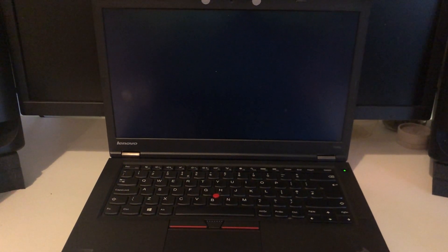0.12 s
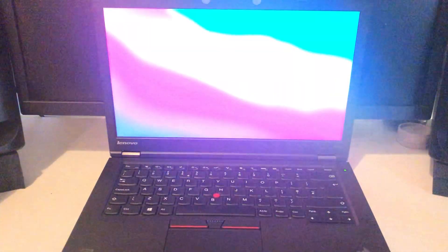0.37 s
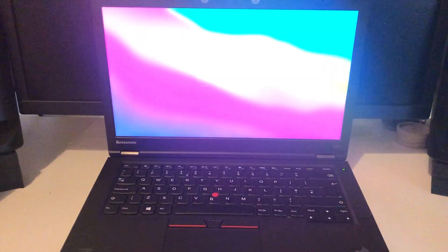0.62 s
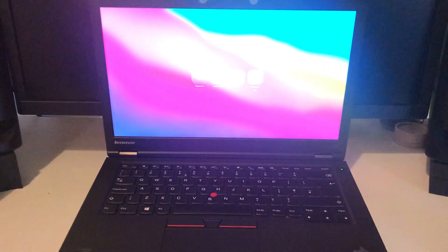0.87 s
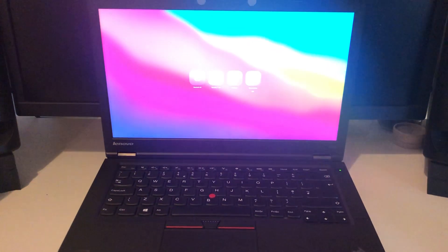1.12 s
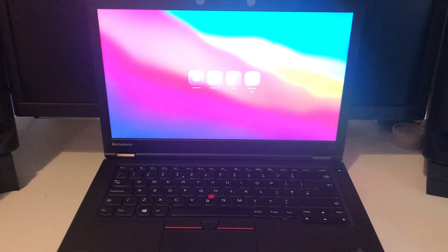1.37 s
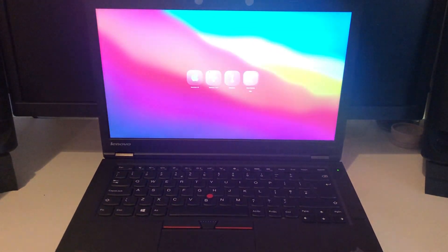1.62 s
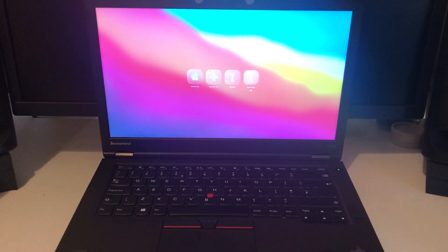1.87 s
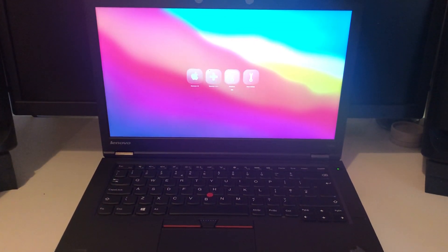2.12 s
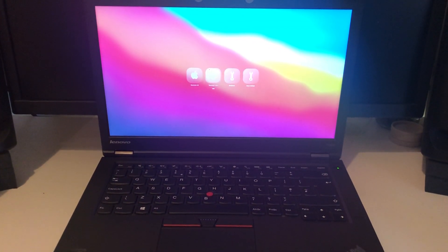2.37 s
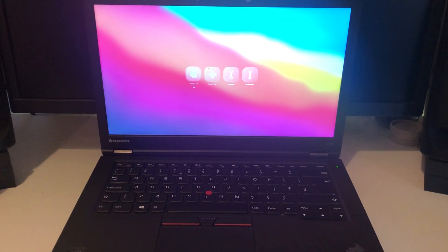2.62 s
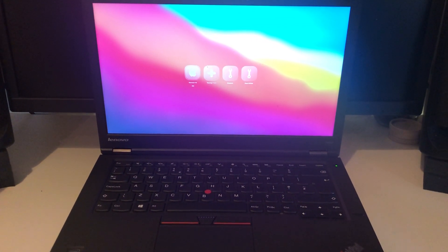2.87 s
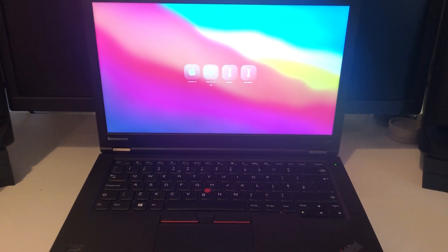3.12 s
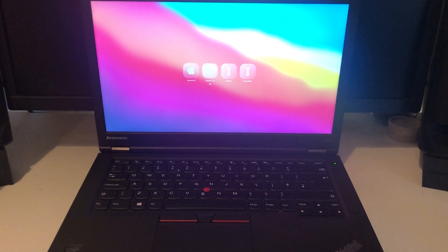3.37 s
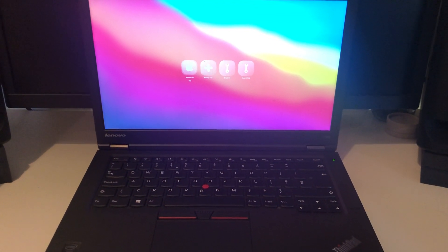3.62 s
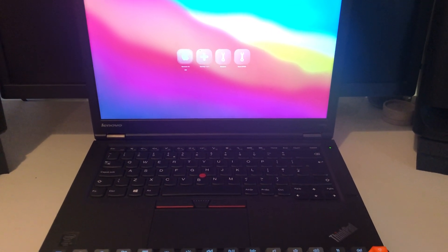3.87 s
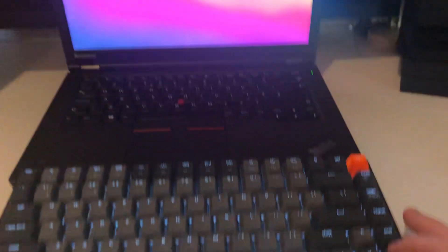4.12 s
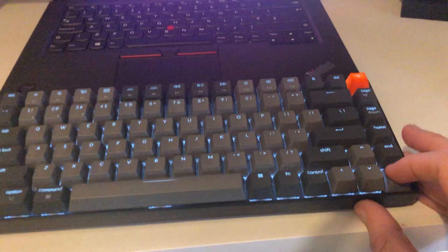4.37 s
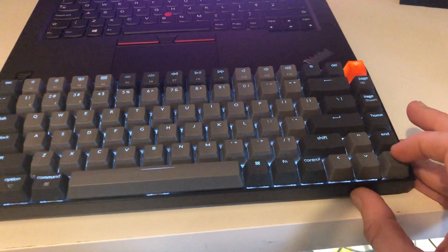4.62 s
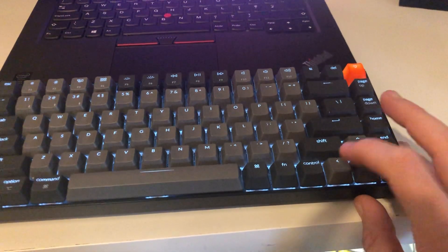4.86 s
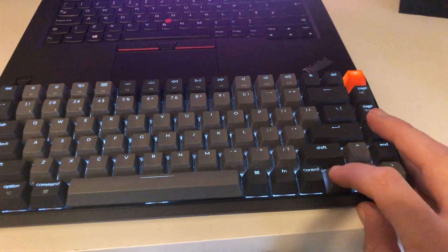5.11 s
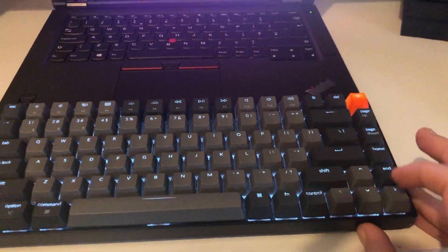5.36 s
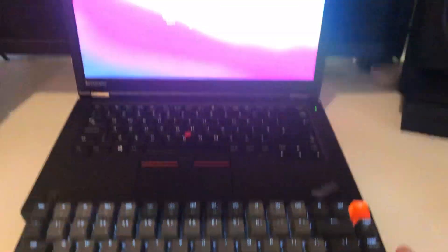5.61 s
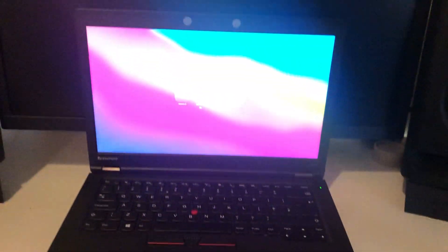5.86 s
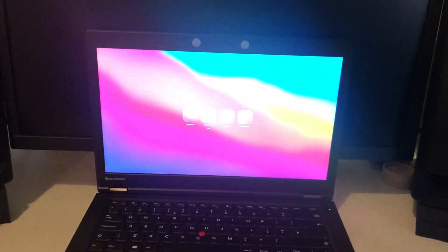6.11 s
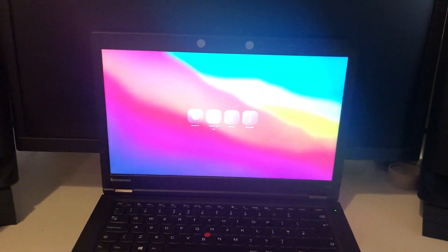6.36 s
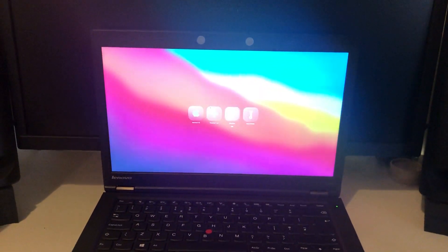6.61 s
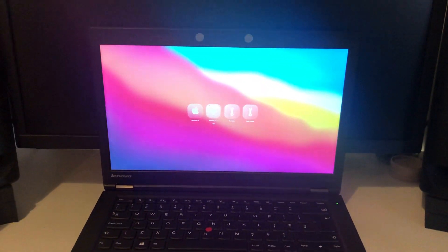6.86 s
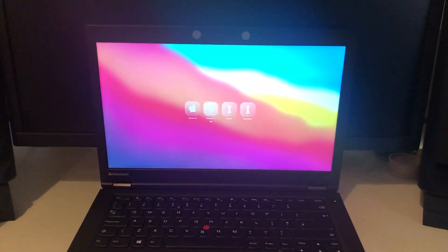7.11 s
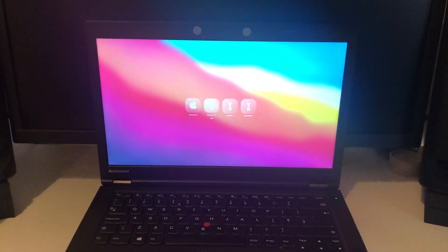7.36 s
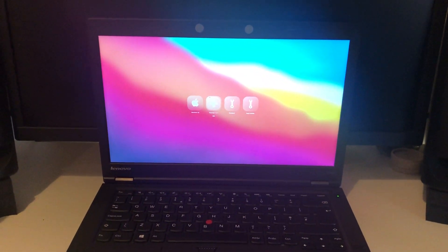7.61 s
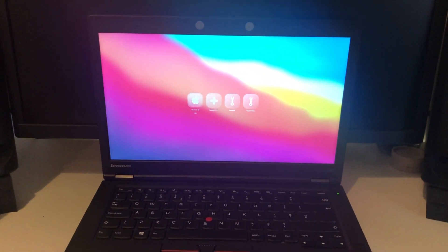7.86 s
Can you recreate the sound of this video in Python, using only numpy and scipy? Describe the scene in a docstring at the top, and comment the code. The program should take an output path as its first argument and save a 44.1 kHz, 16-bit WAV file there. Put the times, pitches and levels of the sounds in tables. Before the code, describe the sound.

A quiet room with faint air, a low wavering rumble and thin microphone hiss. Close by, a mechanical keyboard on a desk is pressed. From 0.1 to 0.6 s four quick, even, light clacks run about 0.15 s apart, with two more near 0.95 and 1.15 s and small spring-back clicks between. A lull holds a very faint bump at 1.5 s. Fuller, hollower presses fall at 2.0, 2.2 and 2.5 s, then 3.1, 3.5 and 3.7 s, each with a clicking release. A soft bump at 4.1 s precedes a dense flurry from 4.4 to 5.3 s, bright and snappy, with a thuddier first hit. Near silence follows until about 6.2 s, when tiny ticks lead to three presses at 6.5 to 6.7 s. A dull low desk bump sounds around 7.0 s, then a firm press at 7.7 s and a sharp, loud release. Short room tail throughout.

```python
"""From the start, faint room air, a low wavering rumble and microphone hiss, all made of coloured noise. Over
them a finger works a mechanical keyboard on a desk, close to a hand-held phone in a quiet room. Each touch,
bottoming-out and release clicks the cap and switch, rings the plastic case and thuds in the desk, all as damped
resonances; a decaying noise tail answers as the room. From 1.46 s a few low tones ring out in small clusters."""
import sys
import numpy as np
from scipy import signal
from scipy.fft import rfft, irfft, next_fast_len
from scipy.io import wavfile
from scipy.ndimage import map_coordinates

SR = 44100
rng = np.random.default_rng(int(sys.argv[2]) if len(sys.argv) > 2 else 0)


def elevation(decibels):
    """Turn decibel levels (scalar or array-like) into linear amplitude ratios."""
    levels = np.asarray(decibels, float)
    return 10 ** (levels / 20)


def wrap_up_sound(samples):
    """Save the sound to the file named by the first command line argument, as 16-bit audio."""
    columns = np.atleast_2d(samples).T
    # keep every value between -1 and 1, then stretch to whole-number steps
    tamed = np.clip(columns, -1, 1)
    steps = np.round(tamed * 32767).astype(np.int16)
    wavfile.write(sys.argv[1], SR, steps)


N = 351918

# Drift of the rumble. Each row: time in seconds, level in dB.
RUMBLE_LEVEL = [(0.0, -66.5), (0.49, -62), (0.9, -69), (1.2, -62.5), (1.64, -68.5), (2.18, -61),
                (2.87, -70.5), (3.13, -65), (3.45, -68.5), (3.67, -62.5), (3.85, -67), (4.45, -72.5),
                (4.62, -61), (5.18, -61.5), (5.5, -72.5), (5.73, -65.5), (6.6, -68), (6.82, -64),
                (7.7, -71.5), (7.87, -57), (7.98, -71)]
# Colour of the rumble. Each row: frequency in Hz, relative density in dB.
RUMBLE_COLOUR = [(15, -112), (30, -18.5), (50, -6.5), (118, 0.5), (211, -9), (267, -12), (330, -18.5),
                 (404, -13), (650, -62), (1100, -120)]
# Drift of the room air. Each row: time in seconds, level in dB.
AIR_LEVEL = [(0, -64.5), (1.2, -73), (1.7, -75), (3, -74), (4.3, -72.5), (5.6, -72), (7.3, -70), (8, -70)]
# Colour of the room air. Each row: frequency in Hz, relative density in dB.
AIR_COLOUR = [(200, -35), (330, -6.5), (500, -13.5), (1000, -12), (1500, -13.5), (2300, -26.5), (4500, -32),
              (9000, -49)]
# Colour of the microphone hiss. Each row: frequency in Hz, relative density in dB.
HISS_COLOUR = [(300, -37), (1500, 0), (3000, -2), (11000, -6.5), (15100, -10.5), (16500, -26)]
HISS_DB = -78

# A fingertip touches or rocks a cap, often just before a press. Each row: start in seconds,
# case ring in dB, click in dB re ring, brightness of the ring in dB per octave.
TOUCHES = [(0.029, -42.5, -11, 5), (0.189, -45, -9.5, 7), (0.396, -44, -17, 4), (0.709, -45.5, -13.5, 8),
           (0.788, -43.5, -17, 5.5), (0.832, -49, -8, 6), (0.909, -48.5, -10, 11.5), (1.244, -48.5, -10, 4),
           (1.621, -49.5, -13, 5), (1.691, -56, -6, -2), (1.746, -58.5, -1.5, -1.1), (1.82, -51, -21, 5),
           (2.12, -39.5, -15.5, 8.5), (2.325, -45.5, -18, -1.1), (3.07, -37.5, -3, 8),
           (3.187, -30.5, -15, 6), (3.765, -40.5, -11, 11.5), (4.43, -35.5, -5, 11),
           (4.594, -37.5, -13, .1), (4.688, -42, -8, 11.5), (4.742, -41.5, -9.5, 2),
           (4.84, -32.5, -2.5, 5.5), (4.986, -36, -7, 13), (5.097, -45, 2, 18), (5.174, -40, -12, 13),
           (6.16, -57, -31, 5), (6.232, -47.5, -16, 15), (6.439, -54, -17, 9), (6.46, -49.5, -11, 11.5),
           (6.713, -34, -12, 2), (7.15, -50.5, -16, 10.5), (7.174, -60, -15, 11), (7.192, -51, -19, 2),
           (7.474, -35.5, -12, 8.5), (7.516, -36.5, -11.5, 8.5)]
# A key springs back against its top stop. Each row: start in seconds, case ring in dB, click in dB re ring.
RELEASES = [(0.04, -26.5, -12.5), (0.204, -31.5, -18), (0.36, -28, -18.5), (0.846, -27, -15),
            (1.264, -35, -15.5), (2.11, -39, -24), (2.295, -32, -22), (2.6, -33, -18.5),
            (2.629, -33, -17.5), (3.196, -32, -7.5), (3.597, -26, -14), (3.608, -33, -16),
            (3.784, -27.5, -16.5), (4.538, -31.5, -18), (4.548, -36.5, -20), (4.693, -29, -20),
            (4.702, -38, -15), (5.089, -22.5, -12.5), (5.26, -22, -15.5), (5.27, -32.5, -15),
            (6.551, -37, -19), (6.847, -25.5, -16.5), (6.966, -41.5, -24), (7.766, -34, -16),
            (7.781, -16, -10.5), (7.929, -57, -18)]
# A key bottoms out. Each row: start in seconds, case ring in dB, click in dB re ring, desk thud in dB,
# place of the key from about -1 to 1.
PRESSES = [(0.137, -31, -14, -50.5, -0.23), (0.287, -28.5, -5.5, -44.5, -1), (0.436, -27.5, -7, -44.5, -1),
           (0.589, -27.5, -5.5, -44, -0.91), (0.945, -28, -8, -46, -0.85), (1.14, -28, -11.5, -46, -0.45),
           (1.991, -18.5, -12.5, -49, 1), (2.178, -19, -16, -47, 1), (2.466, -17.5, -14, -48, 0.97),
           (3.079, -19, -8, -46, -0.32), (3.49, -15.5, -16.5, -48, 0.37), (3.687, -19.5, -17, -46.5, 0.94),
           (4.438, -19, -6.5, -36, -0.61), (4.618, -25.5, -8, -55, -1.4), (4.769, -23.5, -7.5, -48, -1),
           (4.846, -20.5, -8, -43, -1.3), (4.996, -17, -14.5, -50, 0.53),
           (5.185, -17.5, -15.5, -49.5, 0.15), (6.48, -25, -10, -47.5, -0.68),
           (6.591, -23.5, -10.5, -46.5, 0.17), (6.722, -18.5, -13, -46, 1),
           (7.684, -17.5, -14.5, -46, 0.85)]
# Shared by each kind of contact: brightness in dB per octave, length in ms, thud in dB re ring.
TOUCH_MS, TOUCH_THUD_DB = 2, -19
RELEASE_TILT_DB, RELEASE_MS, RELEASE_THUD_DB = 0, 2.45, -29.5
PRESS_TILT_DB, PRESS_MS = 4, 2.6

# Resonances of cap and switch, excited by the click. Each row: centre in Hz, width in Hz, level in dB.
CAP_RESONANCES = [(1560, 3400, -13), (3090, 1260, 20), (5840, 2140, 22.5), (7980, 1020, 23),
                  (9240, 560, 22.5), (10650, 2260, 15), (13200, 2700, 10.5)]
# The switch spring, plucked by the click. Each row: pitch in Hz, level in dB, t60 in seconds.
SPRING_MODES = [(9250, -36, .15), (9420, -38, .1)]
# Gain of the clicks' top layer. Each row: time in seconds, gain in dB.
TREBLE_LEVEL = [(0, -0.5), (1.4, -1.5), (2.1, 4.3), (4, 2.5), (4.4, 4.5), (5.4, 6.4), (6.2, 2.5), (8, 3)]
# The keyboard case. Each row: pitch in Hz, level in dB, t60 in seconds before the finger damps it.
CASE_MODES = [(671.5, -20.5, 0.084), (872, -23.5, 0.14), (1102, -11.5, 0.091), (1209, -6.5, 0.039),
              (1286.5, -5.5, 0.038), (1469, -11.5, 0.046), (1673, -8.5, 0.028), (1774, -20.5, 0.084),
              (1907, -7.5, 0.028), (2091, -5.5, 0.023), (2415, -8.5, 0.014), (2651, -14, 0.023),
              (2990, -31.5, 0.11), (3374, -19.5, 0.023), (3906, -22.5, 0.023)]
# One row per case mode: gain in dB as the blow moves from the middle to place 1, lost as much towards -1.
PLACE_DB = [1.5, -2.9, 2.7, .1, -3.5, 2.3, 0.5, 4, -0.5, 5, 0, 2, -3.5, -0.7, -1]
# The desk top. Each row: pitch in Hz, level in dB, t60 in seconds.
DESK_MODES = [(81.2, -11.5, 0.22), (132.8, -10, 0.54), (154, -4, 0.085), (203.4, -14, 0.29),
              (245.5, -5, 0.29), (271.2, -3.5, 0.2), (353.6, -3.5, 0.14), (400, -11.5, 0.21),
              (685, -31, 0.17)]
# The room's answer. Each row: frequency in Hz, t60 in seconds, share in dB.
ROOM_TAIL = [(99, 0.67, -41), (285, 0.77, -13.5), (637, 0.61, 5), (1170, 0.58, -4), (1630, 0.43, 5),
             (2210, 0.46, -7.5), (3640, 0.56, -6.5), (5050, 0.57, -16), (7540, 0.45, -15),
             (13900, 0.34, -13)]
# Low tones. Each row: start in seconds, level in dB, main pitch in Hz, t60 in seconds.
LOW_TONES = [(1.463, -54, 115, 0.22), (3.965, -63, 220.5, .7), (4.098, -48, 170, 0.058), (4.14, -67, 234, 0.81),
             (6.966, -43, 450, 0.068), (7.018, -35.5, 234.4, 0.084), (7.045, -39, 249, 0.085),
             (7.084, -43.5, 235, 0.098)]


def unit(x):
    """Scales to rms 1."""
    return x / np.sqrt(np.mean(x ** 2) + 1e-20)


def along(points, hz, column=1):
    """Reads a column of (Hz, value, ..) points along a log frequency axis."""
    rows = np.transpose(points)
    return np.interp(np.log(hz + 1), np.log(rows[0] + 1), rows[column])


def level(curve, t):
    """Gain of a (seconds, dB) curve at times t."""
    return elevation(np.interp(t, *np.transpose(curve)))


def wobble(rate):
    """A smooth random curve with rate knots a second."""
    knots = rng.standard_normal(int(N * rate / SR) + 4)
    return map_coordinates(knots, [np.arange(N) * rate / SR])


def noise(colour):
    """White noise shaped to a colour, at rms 1."""
    m = next_fast_len(N + 8192)
    gain = elevation(along(colour, np.fft.rfftfreq(m, 1 / SR)))
    return unit(irfft(rfft(rng.standard_normal(m)) * gain, m)[:N])


def background():
    """Coloured noises: the rumble comes in lumps, the room air drifts, the hiss is steady."""
    t = np.arange(N) / SR
    rumble = level(RUMBLE_LEVEL, t) * elevation(1.6 * wobble(12)) * noise(RUMBLE_COLOUR)
    air = level(AIR_LEVEL, t) * elevation(1.5 * wobble(31)) * noise(AIR_COLOUR)
    hiss = elevation(HISS_DB) * noise(HISS_COLOUR)
    return rumble + air + hiss


def contacts():
    """Lists all contacts: seconds, ring dB, click dB re ring, dB per octave, thud dB re ring, ms, place."""
    touches = [(*row, TOUCH_THUD_DB, TOUCH_MS, 0) for row in TOUCHES]
    releases = [(*row, RELEASE_TILT_DB, RELEASE_THUD_DB, RELEASE_MS, 0) for row in RELEASES]
    presses = [(s, db, click, PRESS_TILT_DB, thud - db, PRESS_MS, place)
               for s, db, click, thud, place in PRESSES]
    return touches + releases + presses


def ring(modes, t, scatter_db, attack):
    """One row of damped sine per mode, each struck at a new strength and a slightly new pitch."""
    hz, db, t60 = np.transpose(modes)[:, :, None]
    chance = rng.standard_normal((2, *hz.shape))
    strength = elevation(db + scatter_db * chance[0] - 60 * t / t60)
    pitch = hz * (1 + 0.01 * chance[1])
    return strength * np.sin(2 * np.pi * pitch * t) * (1 - np.exp(-t / attack))


def cap_resonances(samples):
    """Impulse responses of the cap and switch: band-pass resonances of alternating sign."""
    f = np.fft.rfftfreq(samples, 1 / SR)
    responses = []
    for k, (centre, width, db) in enumerate(CAP_RESONANCES):
        damping = 1j * f * width
        bandpass = damping / (centre * centre - f * f + damping)
        responses.append(irfft((-1) ** k * elevation(db) * bandpass))
    return responses


def case_ring(t, tilt_db, ms, place):
    """The struck plastic case: modes tilted by brightness and key place, damped by the finger."""
    octaves = np.log2(np.transpose(CASE_MODES)[0] / 1300)[:, None]
    gain = elevation(tilt_db * octaves + place * np.c_[PLACE_DB])
    modes = ring(CASE_MODES, t, scatter_db=1.8, attack=ms / 1000)
    finger = np.exp(-(t / 0.017) ** 2 * 2 ** octaves)  # high modes die first
    return (gain * modes * finger).sum(0)


def cap_click(t, s, caps):
    """The blow excites cap and switch resonances and plucks the spring; the top layer has its own level."""
    spring = ring(SPRING_MODES, t, scatter_db=2.1, attack=0.0015).sum(0)
    top = sum(caps[-3:]) + spring
    return sum(caps[:-3]) + level(TREBLE_LEVEL, s) * top


def burst(t, ms, rattle):
    """A single-sample blow and a short noisy rattle after it, at energy 1."""
    blow = rattle * rng.standard_normal(len(t)) * np.exp(-t * 1000 / ms)
    blow[0] = 1
    return blow / np.linalg.norm(blow)


def room_tail(delay):
    """A fresh reverberant noise tail that swells over delay seconds; each frequency dies at its own speed."""
    hz, t, z = signal.stft(rng.standard_normal(SR // 2), SR, nperseg=256)
    share_db = along(ROOM_TAIL, hz, column=2)[:, None]
    t60 = along(ROOM_TAIL, hz)[:, None]
    shape = elevation(share_db - 60 * t / t60) * (1 - np.exp(-t / delay))
    return signal.istft(z * shape, SR, nperseg=256)[1][:SR // 2] / np.sqrt(SR / 40)


def keys():
    """Every contact clicks the cap, rings the case and thuds in the desk, all heard again in the room."""
    lead = 1024  # samples of scrape ahead of the blow
    out, t = np.zeros(N + 2 * SR), np.arange(8192) / SR
    caps = cap_resonances(len(t))
    for s, db, click_db, tilt_db, thud_db, ms, place in contacts():
        case = case_ring(t, tilt_db, ms, place)
        click = elevation(click_db) * cap_click(t, s, caps)
        rattled = signal.fftconvolve(click, burst(t, ms, rattle=0.22))[:len(t)]
        thud = elevation(thud_db) * ring(DESK_MODES, t, scatter_db=1.5, attack=0.005).sum(0)
        early = case * np.exp(-t / 0.004)
        echo = signal.fftconvolve(click + early + thud, room_tail(delay=0.007))
        # the stem scrapes down its guide, swelling up to the blow
        slide = elevation(-44) * rng.standard_normal(lead) * np.exp(-t[lead - 1::-1] / 0.0072)
        at = out[round(s * SR):]
        at[:lead + len(t) - 1] += elevation(db) * signal.fftconvolve(slide, click + early)
        at[lead:][:len(t)] += elevation(db) * (case + rattled + thud)
        at[lead:][:len(echo)] += elevation(db) * echo
    return out[lead:][:N]


def low_tones():
    """Each row rings a small cluster of low tones with a soft onset."""
    out, t = np.zeros(N + SR), np.arange(SR // 2) / SR
    for s, db, hz, t60 in LOW_TONES:
        cluster = [(hz * 0.72, -8, t60), (hz, 0, t60), (hz * 1.2, -5, t60), (hz * 2.15, -22, t60)]
        knock = ring(cluster, t, scatter_db=1.5, attack=0.0055).sum(0)
        out[round(s * SR):][:len(t)] += elevation(db) * knock
    return out[:N]


def scene():
    """The quiet room, the keys and the low tones add up at one microphone."""
    return (background() + keys() + low_tones())[None]


def band_limit(x):
    """A steep low-pass at the top of the band."""
    return signal.sosfilt(signal.butter(12, 16720, fs=SR, output="sos"), x)


def record(dry):
    """The phone stores the finished mix."""
    return band_limit(dry)


dry = scene()
out = record(dry)
wrap_up_sound(out)
```